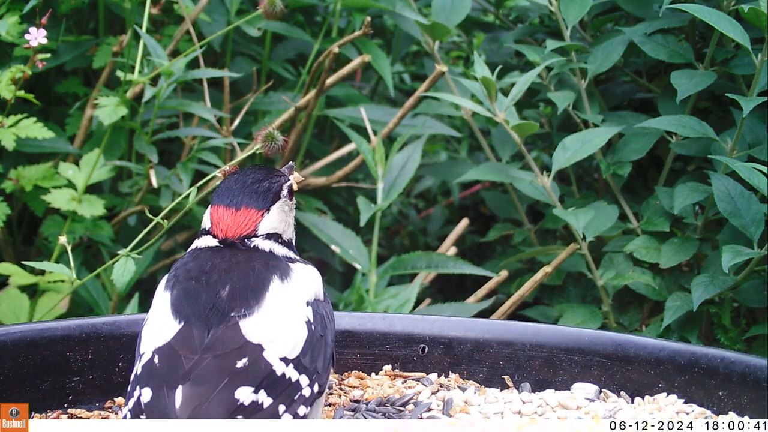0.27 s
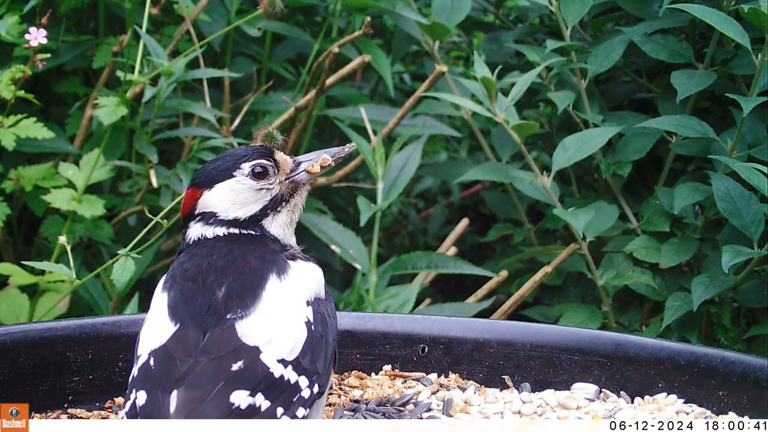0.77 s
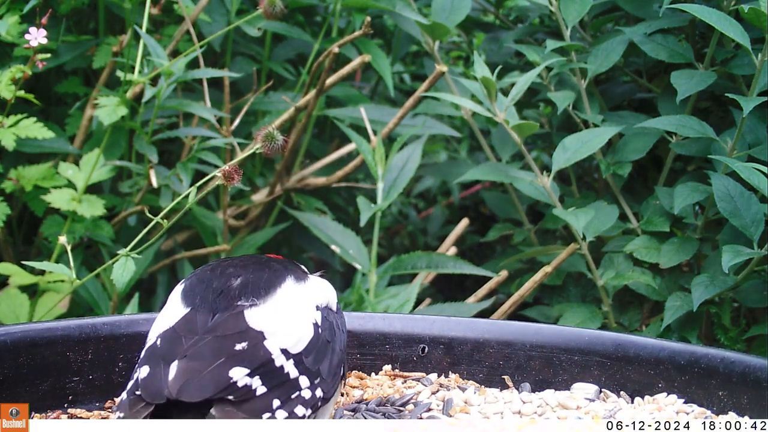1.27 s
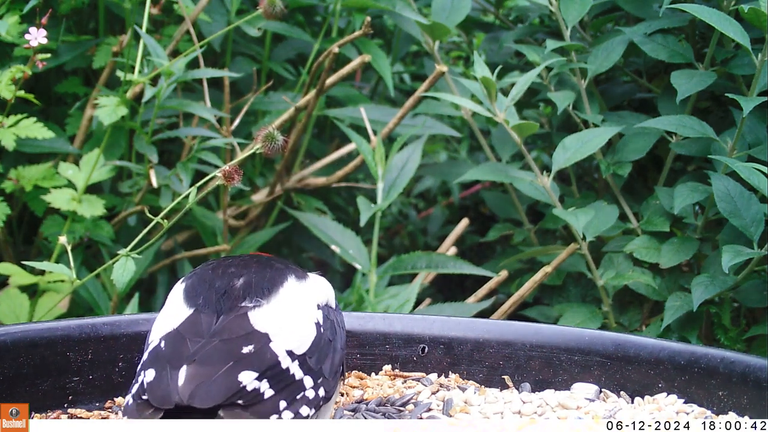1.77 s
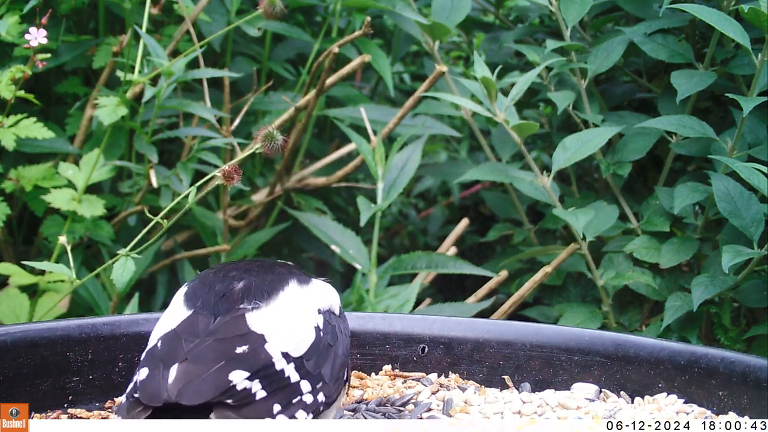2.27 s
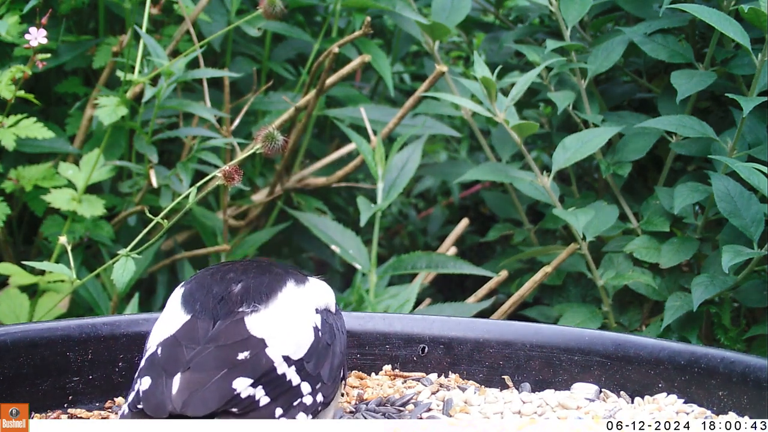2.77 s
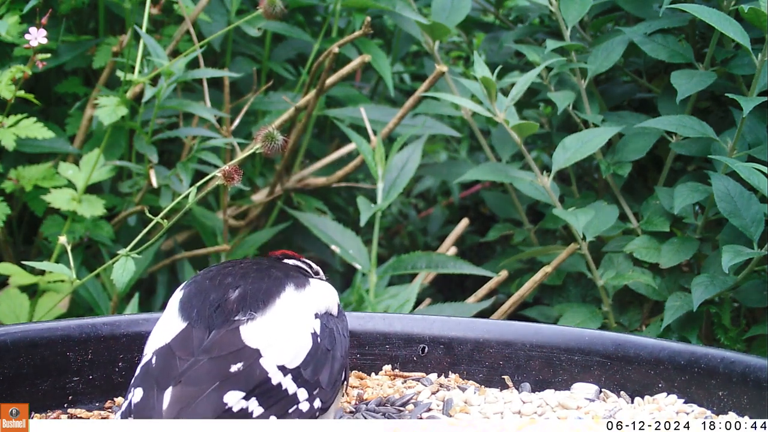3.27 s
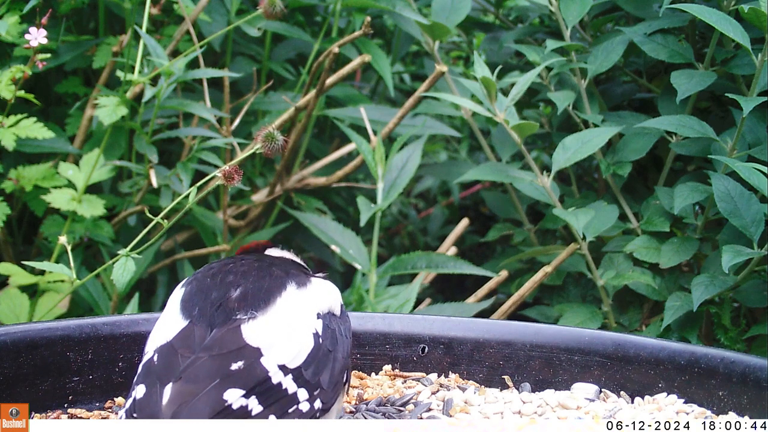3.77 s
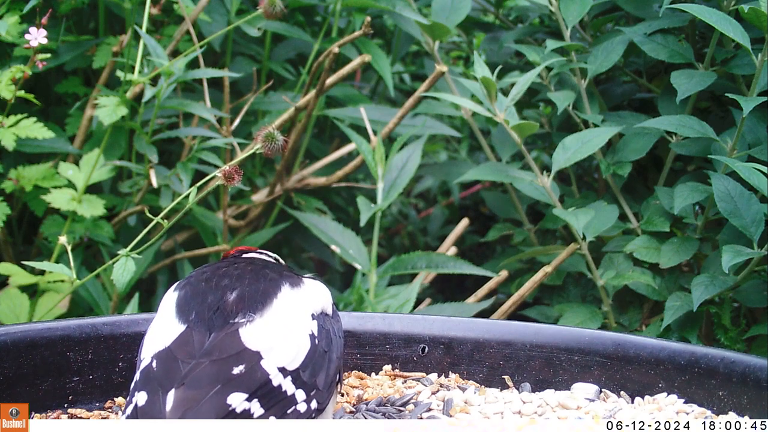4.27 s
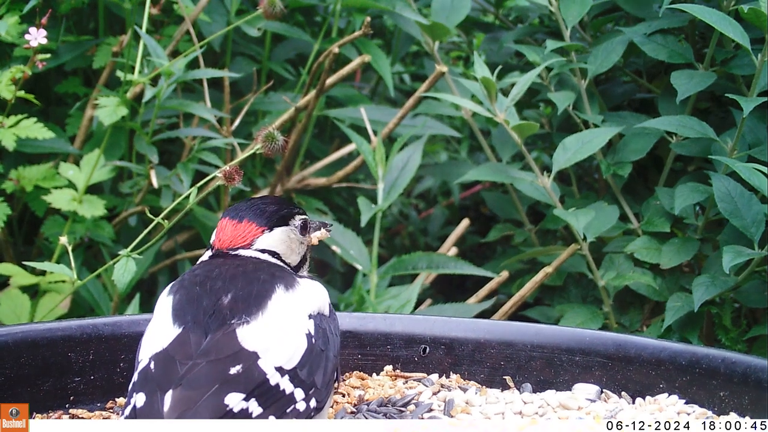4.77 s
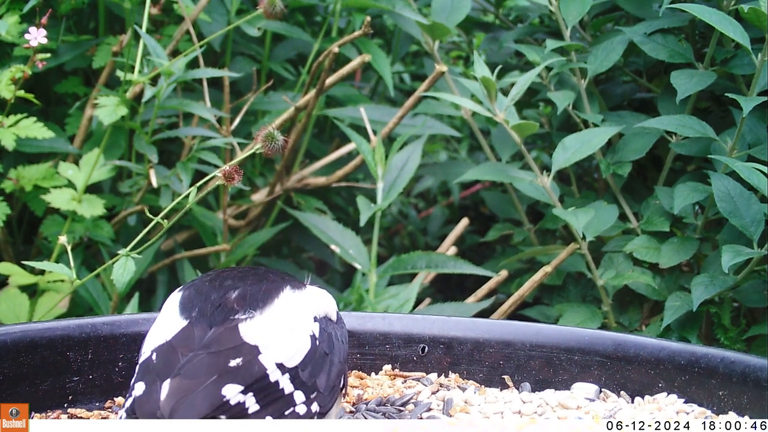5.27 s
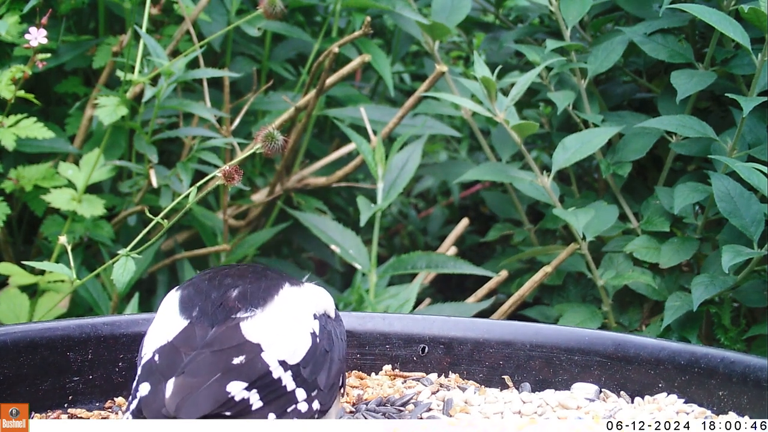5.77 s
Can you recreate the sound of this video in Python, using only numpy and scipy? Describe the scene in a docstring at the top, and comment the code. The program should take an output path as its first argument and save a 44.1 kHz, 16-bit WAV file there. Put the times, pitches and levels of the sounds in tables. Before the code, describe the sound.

A woodpecker pecks and cracks seed in a plastic tray with sharp clicks and hollow knocks, while faint songbirds chirp outdoors.

```python
"""In a garden, a woodpecker pecks and cracks seed in a plastic tray just in front of a small camera.
Its beak clicks and scrapes, the tray knocks and booms, and seeds tick and rustle under its feet.
Songbirds whistle near and far, and traffic rumbles in the distance.
The microphone sits behind a small hole whose cavity rings near 4 kHz."""
import sys
import numpy as np
from scipy import signal
from scipy.fft import rfft, irfft, next_fast_len
from scipy.io import wavfile
from scipy.ndimage import map_coordinates

SR = 44100
rng = np.random.default_rng(int(sys.argv[2]) if len(sys.argv) > 2 else 0)


def pcm_store(signal):
    """Save signal as 16-bit PCM."""
    levels = np.round(np.clip(np.atleast_2d(signal), -1, 1) * 32767)
    wavfile.write(sys.argv[1], SR, levels.astype(np.int16).T)


N = 264996


def woodpecker():
    """The beak strikes sharply, or sets in softly as it scrapes through seed or crushes a husk."""
    # both: start_s, level_db, brightness_db, knock_db (the last two relative to the level)
    pecks = [(0.0144, -37, -21, -24), (0.1312, -51, -3.5, -15), (0.2853, -41, -15.5, -24),
             (2.2947, -38, -3, -28), (2.407, -46.5, -14.5, -13), (2.4639, -35.5, -19.5, -18.5),
             (2.9442, -49, -27, -8), (3.6259, -43.5, -1.5, -16.5), (3.8992, -36, -22, -13),
             (4.155, -37, -28, -16), (4.396, -51.5, -8, -16.5), (4.7204, -30.5, -17, -22),
             (4.7228, -29.5, -30, -19), (4.7432, -40, -15, -13), (4.8238, -28.5, -28, -22),
             (5.1475, -41.5, -18, -11), (5.238, -48, -15, -18), (5.3552, -40, -21, -7),
             (5.451, -43, -1, -17.5), (5.9393, -48.5, -15, -15.5), (5.983, -52.5, -21, -4)]
    scrapes = [(0.0823, -47, -22.5, -21.5), (0.184, -41, -22, -22), (0.194, -43, -13, -22),
               (1.1224, -51.5, -13, -14), (4.4588, -50, -13, -28), (4.596, -45.5, -14.5, -14),
               (4.6324, -44, -14.5, -11), (4.645, -44.5, -16, -13), (4.7262, -25, -24, -18),
               (4.7336, -30, -32, -14), (4.7471, -32, -23, -17), (4.7517, -38, -22, -7),
               (4.761, -28, -25, -31.5), (4.854, -50, -16, -15.5), (5.2972, -41.5, -33, -17),
               (5.4173, -48.5, -16, -11), (5.6925, -46, -21, -21), (5.8964, -46, -20.5, -8.5),
               (5.9903, -40.5, -15.5, -10)]
    pecking = beak_contacts(pecks, decay_s=.0045, tail_db=-19, spike=2.6)
    scraping = beak_contacts(scrapes, decay_s=.02, tail_db=-16, spike=.2, rise_s=.0025)
    return pecking + scraping


def beak_contacts(hits, decay_s, tail_db, spike, rise_s=0):
    """Each touch is a gritty click plus a knock of the tray; brighter ones have more treble."""
    # bands of the click: pitch_hz, width_hz, level_db
    bands = [(4580, 2000, 7.5), (5750, 1500, 21.5), (9720, 3100, 32), (12000, 5700, 31)]
    # for each band: db_gained_per_db_of_brightness
    brightening = [0, .6, 1, 1.5]
    # the tray's ringing tones: pitch_hz, width_hz, level_db
    tray_tones = [(1840, 350, -1.5), (2430, 330, 1.5)]
    band_tracks, knocks = np.zeros((len(bands), N)), np.zeros(N)
    for start_s, level_db, brightness_db, knock_db in hits:
        burst = amp(level_db) * grit(decay_s, tail_db, spike, rise_s)
        for track, slope in zip(band_tracks, brightening):
            add(track, start_s + .0005, amp(slope * brightness_db) * burst)
        add(knocks, start_s + .0005, amp(knock_db) * burst)
    clicks = sum(amp(db) * filtered(track, lambda f: ringing([(hz, width_hz, 0)], f) ** 2)
                 for track, (hz, width_hz, db) in zip(band_tracks, bands))
    return clicks + amp(24) * filtered(knocks, lambda f: ringing(tray_tones, f))


def tray_booms():
    """Pecks that reach the tray's floor make it boom."""
    # blows on the floor: start_s, level_db
    blows = [(3.902, -19), (4.158, -29.5), (4.719, -23.5), (4.744, -22), (5.149, -17), (5.354, -22),
             (5.694, -25), (5.895, -28.5), (5.983, -31)]
    # its ringing tones: pitch_hz, width_hz, level_db
    floor_tones = [(486, 170, 1.5), (680, 110, 2), (980, 120, 5)]
    kicks = np.zeros(N)
    for start_s, level_db in blows:
        kicks[round(start_s * SR)] = amp(level_db)
    return filtered(kicks, lambda f: ringing(floor_tones, f))


def seed_ticks():
    """A seed is too small to ring, so it ticks with a broad burst of noise."""
    # seeds hitting each other: start_s, level_db, centre_hz
    ticks = [(0.3719, -30, 11600), (0.384, -29.5, 11900), (0.3994, -33, 12200), (0.4194, -40, 12700),
             (0.4406, -31, 11600), (0.4923, -41.5, 11400), (0.542, -33.5, 12500), (0.6194, -41.5, 7350),
             (0.8444, -37, 12000), (0.9108, -35, 11500), (0.9483, -33, 12000), (0.987, -36.5, 11800),
             (1.0261, -37, 12000), (1.1424, -40.5, 5810), (1.7894, -41.5, 9510), (2.9267, -37, 11900),
             (3.1717, -38.5, 6730), (4.193, -41, 5210), (4.2996, -44, 5630), (5.1415, -34.5, 5400),
             (5.168, -36, 11500), (5.218, -30, 12600), (5.3908, -32.5, 12300)]
    track = np.zeros(N)
    for start_s, level_db, centre_hz in ticks:
        band = signal.butter(2, [0.727 * centre_hz, 1.7 * centre_hz], "bandpass", fs=SR)
        burst = grit(decay_s=0.018, tail_db=-8, spike=3)
        add(track, start_s, amp(level_db) * signal.lfilter(*band, burst))
    return track


def seed_rustle():
    """Shifting seeds trickle in clumps of tiny, bright clicks."""
    # one list for each stir: time_s, level_db
    stirs = [
        [(0.0, -58), (0.176, -64.5), (0.604, -70.5), (0.958, -69), (1.3, -78.5)],
        [(4.05, -77), (4.3, -68), (4.7, -72.5), (5.052, -84.5), (5.26, -80), (5.74, -87.5), (6.009, -71)],
    ]
    t = np.arange(N) / SR
    clicks = rng.standard_normal(N) * amp(3.3 * wobble(40) + 4.5 * wobble(500))
    treble = unit(filtered(clicks, lambda f: (f / 7000) ** 2 / (1 + (f / 7000) ** 2)))
    return treble * sum(loudness(rows) * (t >= rows[0][0]) * (t < rows[-1][0]) for rows in stirs)


def thrush():
    """A thrush whistles notes that swell, fade and warble, and short falling twitters."""
    # one list for each note: time_s, pitch_hz
    notes = [
        [(2.26, 1630), (2.314, 1738), (2.376, 1734), (2.45, 1920), (2.494, 1853), (2.51, 1738)],
        [(2.57, 2790), (2.598, 1894), (2.622, 1710), (2.65, 2080), (2.67, 2004)],
        [(2.922, 2039), (2.938, 2660), (2.955, 2844), (3.152, 2662), (3.2, 2773)],
        [(3.2, 2990), (3.27, 2898)],
        [(3.33, 2800), (3.376, 2613), (3.5, 2598)],
    ]
    # one row for each note: peak_db, fade_db, octave_db
    levels = [(-68.5, 6, -23), (-67.5, 3, -29), (-66, 6.5, -23.5), (-69.5, 19.5, -28), (-82, 6, -30)]
    # start_s, start_hz, length_s
    twitters = [(3.117, 2670, 0.0105), (3.23, 2430, 0.021), (3.246, 2230, .013), (3.271, 2288, 0.018)]
    swell_s, swell_db, warble_hz = 0.0227, 10, 23.76
    song = np.zeros(N)
    for rows, (peak_db, fade_db, octave_db) in zip(notes, levels):
        times, pitches = np.transpose(rows)
        start_s, end_s = times[0], times[-1]
        t = np.arange(start_s, end_s, 1 / SR)
        level_db = peak_db + np.interp(t, [start_s, start_s + swell_s, end_s], [-swell_db, 0, -fade_db])
        level_db += 2.98 * wobble(50.4, len(t))
        pitch_hz = np.interp(t, times, pitches) + warble_hz * wobble(90.4, len(t))
        add(song, start_s, whistle(pitch_hz, level_db, fade_s=0.0013, octave_db=octave_db))
    for start_s, start_hz, length_s in twitters:
        pitch_hz = np.linspace(start_hz, 1903, round(length_s * SR))
        add(song, start_s, whistle(pitch_hz, level_db=-68, fade_s=0.0037))
    return song


def small_bird():
    """Thin chirps whose pitch and level rise and fall together in an arch."""
    # top_s, top_hz, top_db, length_after_top_s
    chirps = [(0.02, 7560, -41.5, 0.016), (0.784, 7120, -57.5, 0.0067)]
    arch_s, drop_hz, drop_db = 0.02, 1000, 20  # the drops are reached arch_s from the top
    song = np.zeros(N)
    for top_s, top_hz, top_db, after_s in chirps:
        t = np.arange(-min(arch_s, top_s), after_s, 1 / SR)
        arch = (t / arch_s) ** 2
        pitch_hz = top_hz - drop_hz * arch + 22 * wobble(90, len(t))
        chirp = whistle(pitch_hz, top_db - drop_db * arch, fade_s=0.0013, octave_db=-40)
        add(song, max(top_s + t[0], 0), chirp)
    return song


def near_birds():
    """The two birds close by, each with its echoes."""
    low, high = thrush(), small_bird()
    return low + amp(-1.5) * echoes(low, decay_s=0.35) + high + amp(-18) * echoes(high, decay_s=.2)


def far_birds():
    """Many paths through the leaves make each note flicker, which blurs its pitch."""
    # single notes, and one falling note that repeats: start_s, level_db, start_hz, end_hz, length_s, blur_hz
    calls = [(0.682, -92, 3532, 4150, 0.073, 100), (0.76, -83, 4160, 4100, 0.29, 281.9),
             (1.107, -79, 3900, 3800, 0.025, 100), (1.226, -81.5, 5630, 5620, 0.14, 60),
             (1.292, -80.5, 3697, 3670, 0.25, 30), (1.365, -87, 4473, 4482, 0.11, 80),
             (1.419, -84, 3350, 3310, 0.312, 245.4), (1.58, -88, 4470, 4490, 0.25, 130),
             (2.519, -96, 3800, 3865, 0.11, 90), (3.005, -84.5, 3670, 3754, 0.23, 203),
             (3.624, -74, 2540, 2750, 0.186, 450.6), (3.699, -80.5, 4450, 4380, 0.11, 297),
             (3.738, -76.5, 5430, 5180, 0.099, 250), (3.769, -75.5, 3180, 3089, 0.3, 501),
             (3.783, -79.5, 3764, 3670, 0.28, 276.6), (3.796, -84, 5750, 5570, 0.23, 500),
             (3.97, -77, 2600, 2570, 0.06, 79), (4.176, -84, 3905, 4020, 0.19, 147.9),
             (4.663, -84.5, 3800, 4850, 0.045, 60), (4.934, -90, 3600, 3710, 0.136, 144),
             (5.033, -83, 4134, 4190, 0.13, 250), (5.158, -84, 3730, 3488, 0.078, 203)]
    refrain = (5.335, -85, 4200, 2930, .07, 160)
    call_fade_db, refrain_swell_db, repeat_s = 5.5, 6, .16
    notes = [(*row, -call_fade_db) for row in calls]
    notes += [(refrain[0] + k * repeat_s, *refrain[1:], refrain_swell_db) for k in range(4)]
    song = np.zeros(N)
    for start_s, start_db, start_hz, end_hz, length_s, blur_hz, change_db in notes:
        n = round(length_s * SR)
        level_db = start_db + change_db * np.arange(n) / n
        note = whistle(np.linspace(start_hz, end_hz, n), level_db, fade_s=0.0098)
        flicker = unit(0.28 + wobble(2 * blur_hz, n))
        add(song, start_s, note * flicker)
    return song + amp(-3.5) * echoes(song, decay_s=0.71)


def mount_sways():
    """The camera's mount sways as the bird shifts its weight: a slow swing of pressure."""
    # middle_s, level_db, pitch_hz, half_length_s
    sways = [(4.64, -32.5, 25, 0.041), (4.956, -32.5, 11.6, 0.033)]
    t = np.arange(N) / SR
    return sum(amp(db) * np.cos(2 * np.pi * hz * (t - s)) * np.exp(-((t - s) / half_s) ** 2)
               for s, db, hz, half_s in sways)


def traffic():
    """Distant traffic rumbles while one far engine drones in and out."""
    # loudness over time: time_s, level_db
    rumble_levels = [(0, -53.5), (.2, -51), (.7, -52.5), (1.7, -51.5), (2.9, -53), (3.9, -51.5),
                     (4.15, -52.5), (4.7, -51), (5.6, -52.5), (6.01, -52)]
    engine_levels = [(0, -60.5), (.13, -58.5), (.3, -67.5), (.5, -68.5), (.8, -62), (1.1, -71.5),
                     (1.35, -64), (1.7, -70), (5.1, -74.5), (5.46, -65), (5.72, -76), (6.01, -77.5)]
    # tone colour: pitch_hz, level_db
    rumble_colour = [(5, -3), (10, 5), (20, -3), (48, -3.5), (79, -4.5), (120, -13), (190, -12.5),
                     (300, -23), (600, -34), (1200, -81.5)]
    engine_colour = [(120, -47), (195, -15.5), (222, 2.5), (255, -16.5), (400, -46.5)]
    rumble = loudness(rumble_levels) * noise(rumble_colour)
    return rumble + loudness(engine_levels) * noise(engine_colour)


def low_hum():
    """Two deep tones waver in pitch."""
    # pitch_hz, level_db, waver_hz
    tones = [(30.1, -56.5, 3.04), (61.9, -59.5, 4.96)]
    return sum(amp(db) * np.sin(2 * np.pi * np.cumsum(hz + waver_hz * wobble(5)) / SR)
               for hz, db, waver_hz in tones)


def garden_rush():
    """The garden's soft rush slowly dies down."""
    # pitch_hz, level_db
    colour = [(150, -20.5), (300, 3.5), (600, 0), (950, 3), (1700, -5), (2700, -15), (4000, -21),
              (6000, -28), (9000, -29), (14000, -49)]
    t = np.arange(N) / SR
    level_db = -65.5 - 0.54 * t + 0.56 * wobble(6)
    return amp(level_db) * noise(colour)


def grit(decay_s, tail_db, spike, rise_s=0):
    """A spike and a short burst of noise with a weaker tail, of total energy 1."""
    t = np.arange(SR // 20) / SR
    fade = amp(-60 * t / decay_s) + amp(tail_db - 60 * t / 0.074)
    rise = np.minimum(1, (t + 1 / SR) / (rise_s + 1 / SR))
    burst = rng.standard_normal(len(t)) * fade * rise
    burst[0] += spike
    return burst / np.linalg.norm(burst)


def whistle(pitch_hz, level_db, fade_s, octave_db=-30):
    """A pure gliding tone with soft ends and a weak tone an octave above."""
    t = np.arange(len(pitch_hz)) / SR
    phase = 2 * np.pi * np.cumsum(pitch_hz) / SR + rng.uniform(0, 2 * np.pi)
    ends = np.clip(np.minimum(t, t[-1] - t) / fade_s, 0, 1)
    return np.sqrt(2) * amp(level_db) * ends * (np.sin(phase) + amp(octave_db) * np.sin(2 * phase))


def echoes(x, decay_s):
    """A wash of echoes from leaves and walls, falling 60 dB in decay_s."""
    t = np.arange(SR // 2) / SR
    tail = rng.standard_normal(len(t)) * amp(-60 * t / decay_s) * (t > .008)
    return signal.fftconvolve(x, tail / np.linalg.norm(tail))[:N]


def ringing(tones, f):
    """How an object with these ringing tones responds at each frequency f."""
    return sum((-1) ** k * amp(db) * 1j * f * width / (hz * hz - f * f + 1j * f * width)
               for k, (hz, width, db) in enumerate(tones))


def noise(colour):
    """Noise of strength 1, shaped by rows of pitch_hz, level_db."""
    hz, db = np.transpose(colour)
    response = lambda f: amp(np.interp(np.log(f + 1), np.log(hz + 1), db))
    return unit(filtered(rng.standard_normal(N), response))


def filtered(x, response):
    """Multiply each frequency in x by its response."""
    size = next_fast_len(N + SR // 2)
    return irfft(rfft(x, size) * response(np.fft.rfftfreq(size, 1 / SR)), size)[..., :N]


def wobble(rate, count=N):
    """A smooth curve through `rate` random points a second."""
    points = rng.standard_normal(int(count * rate / SR) + 4)
    return map_coordinates(points, [np.arange(count) * rate / SR])


def loudness(rows):
    """A gain curve through rows of time_s, level_db."""
    return amp(np.interp(np.arange(N) / SR, *np.transpose(rows)))


def amp(db):
    """Turn decibels into a gain."""
    return 10 ** (np.asarray(db) / 20)


def unit(x):
    """Scale x to an average strength (rms) of 1."""
    return x / np.sqrt(np.mean(x ** 2) + 1e-20)


def add(track, start_s, sound):
    """Mix a sound into a track."""
    part = track[round(start_s * SR):][:len(sound)]
    part += sound[:len(part)]


def scene():
    """All sources at the camera, in one channel."""
    feeding = woodpecker() + tray_booms() + seed_ticks()
    birds = near_birds() + far_birds()
    background = seed_rustle() + traffic() + low_hum() + garden_rush() + mount_sways()
    return (feeding + birds + background)[None]


def record(dry):
    """The microphone's hole and cavity ring like a bottle, its amplifier hisses, the top treble is cut."""
    # higher ringing tones of the housing: pitch_hz, width_hz, level_db
    housing_tones = [(5230, 240, -15), (10070, 7200, -14.5), (11970, 750, 1.5)]
    # pitch_hz, level_db
    hiss_colour = [(100, -8.5), (5200, 0.4), (8200, -0.2), (11200, -1), (14100, -3.6)]
    hole_hz, width_hz, hiss_db, top_hz = 3883, 496, -77.5, 13950
    bottle = lambda f: hole_hz ** 2 / (hole_hz ** 2 - f * f + 1j * f * width_hz)
    heard = filtered(dry, lambda f: bottle(f) + ringing(housing_tones, f))
    hiss = amp(hiss_db) * noise(hiss_colour)
    return filtered(heard + hiss, lambda f: f < top_hz)


dry = scene()
out = record(dry)
pcm_store(out)
```